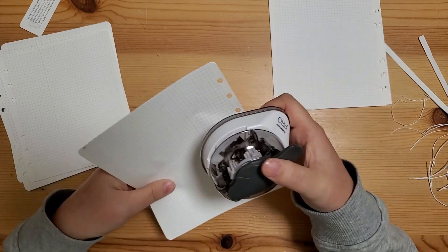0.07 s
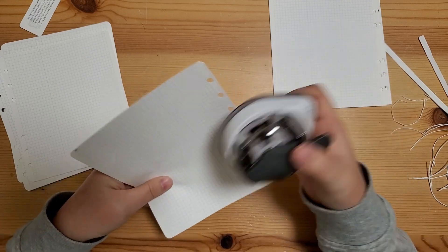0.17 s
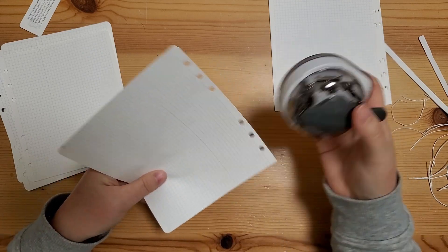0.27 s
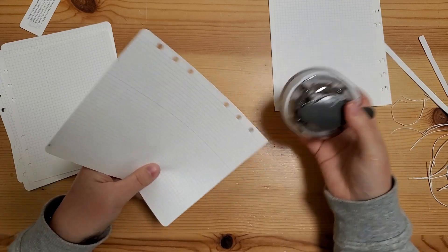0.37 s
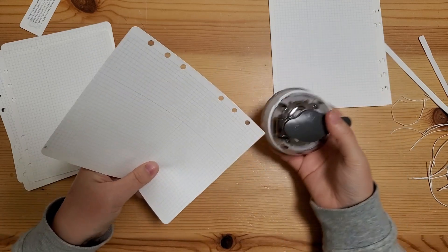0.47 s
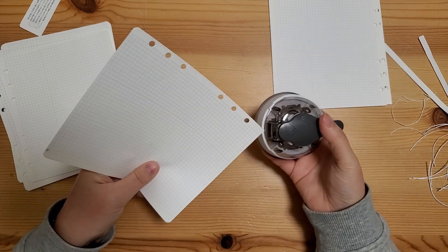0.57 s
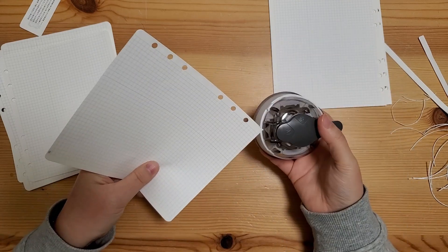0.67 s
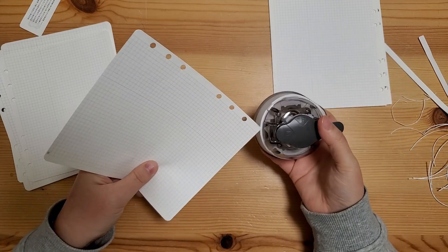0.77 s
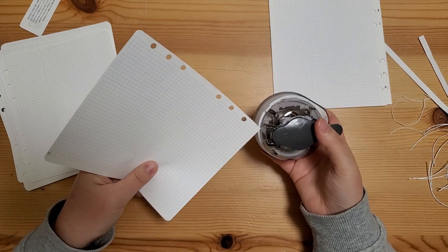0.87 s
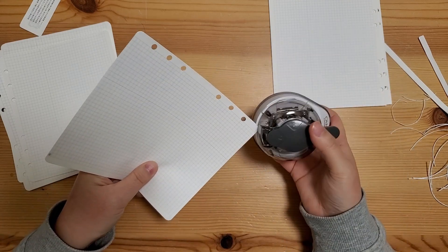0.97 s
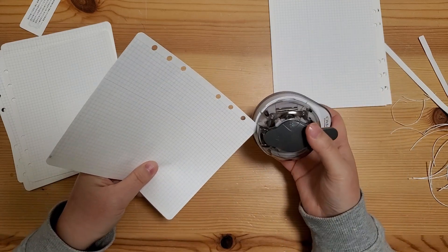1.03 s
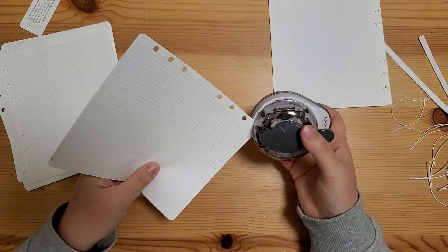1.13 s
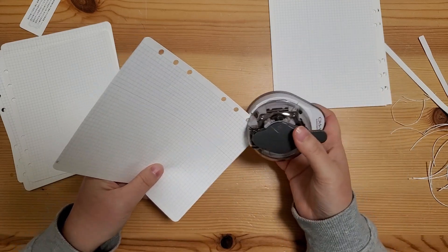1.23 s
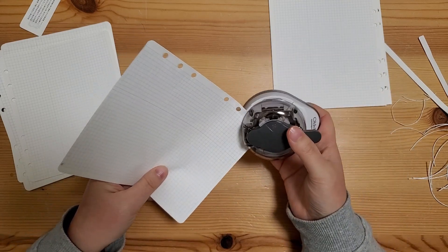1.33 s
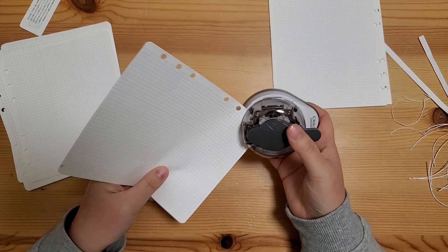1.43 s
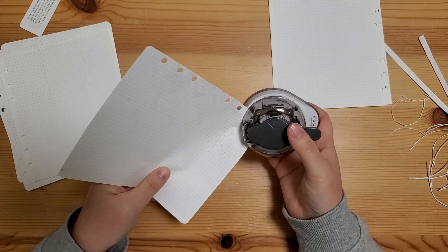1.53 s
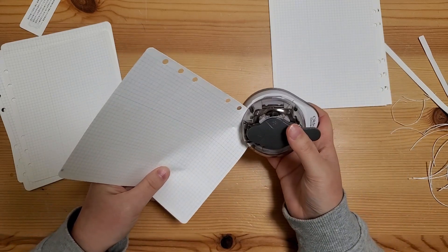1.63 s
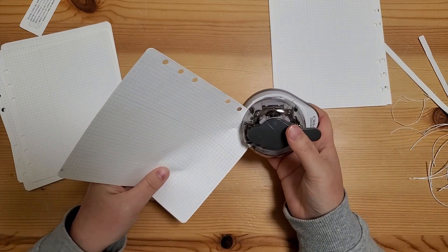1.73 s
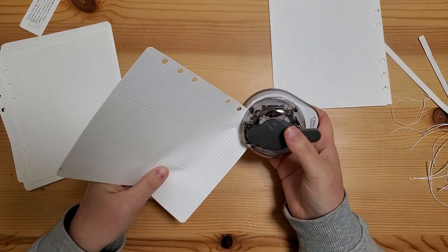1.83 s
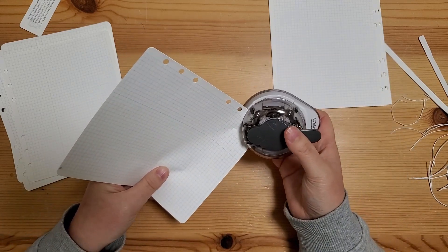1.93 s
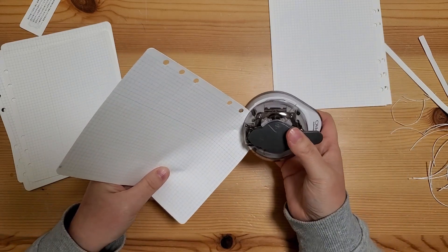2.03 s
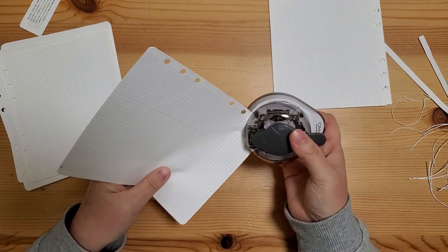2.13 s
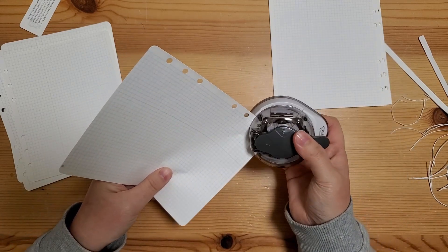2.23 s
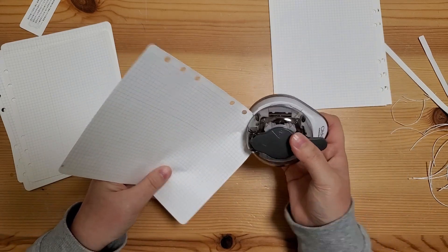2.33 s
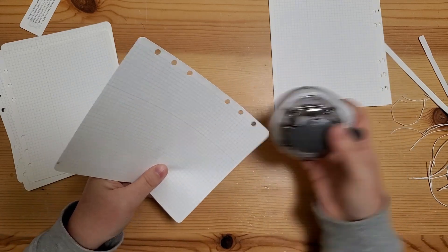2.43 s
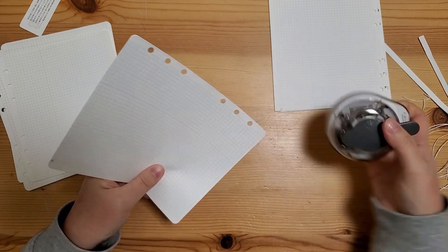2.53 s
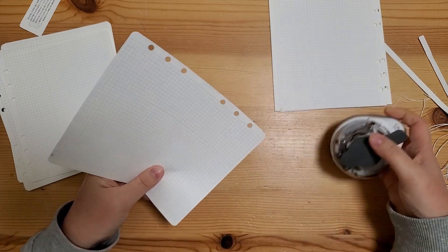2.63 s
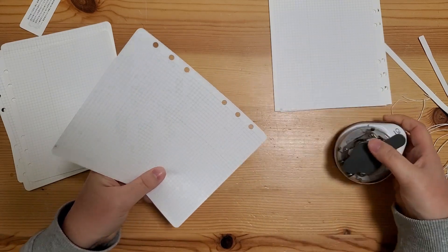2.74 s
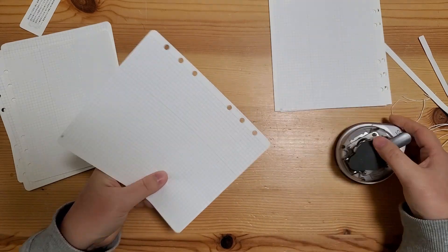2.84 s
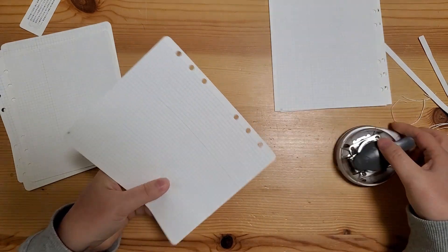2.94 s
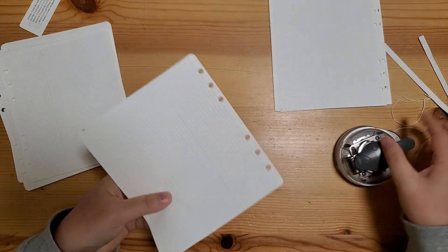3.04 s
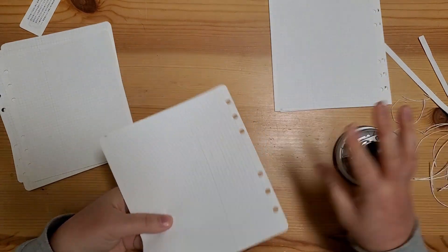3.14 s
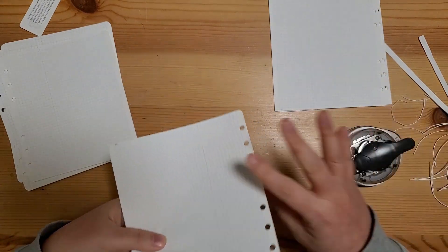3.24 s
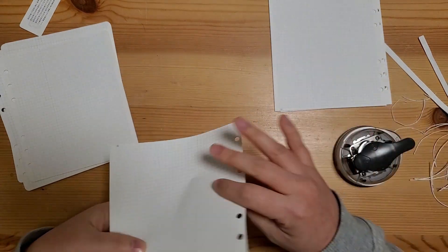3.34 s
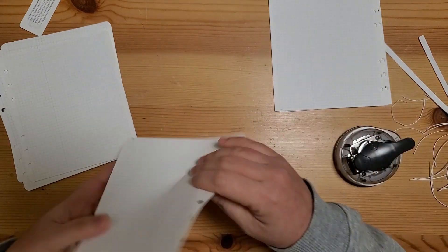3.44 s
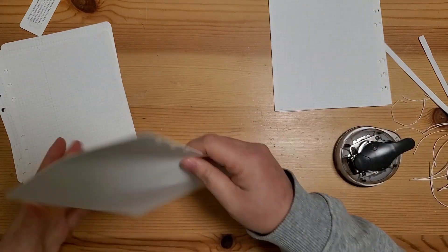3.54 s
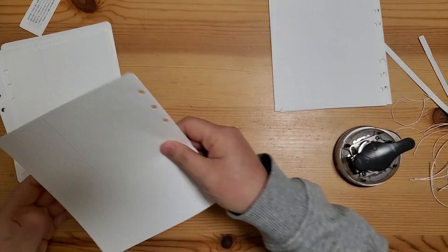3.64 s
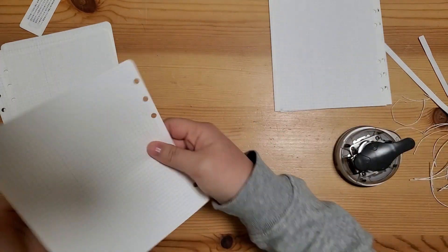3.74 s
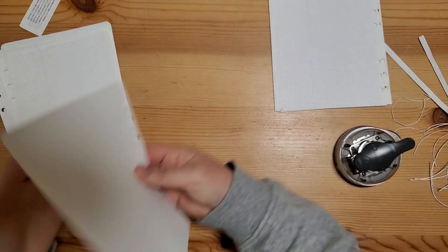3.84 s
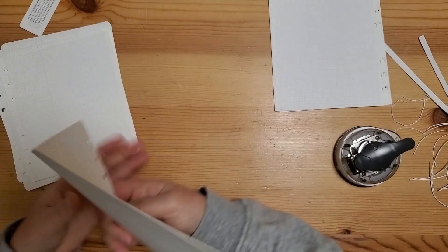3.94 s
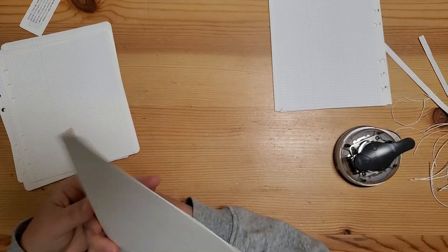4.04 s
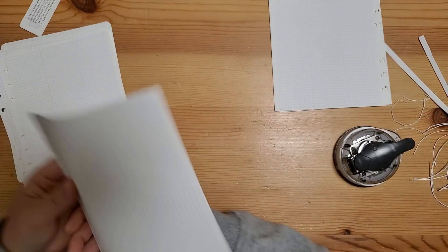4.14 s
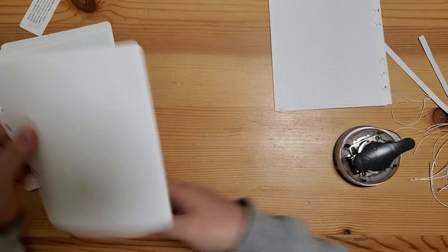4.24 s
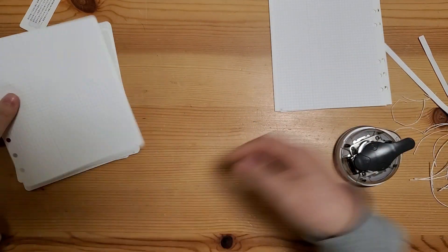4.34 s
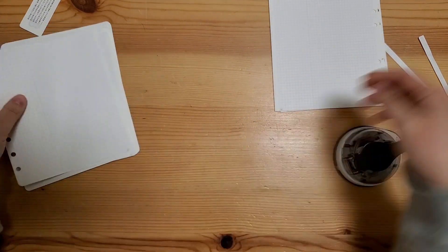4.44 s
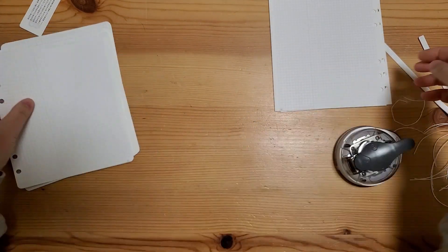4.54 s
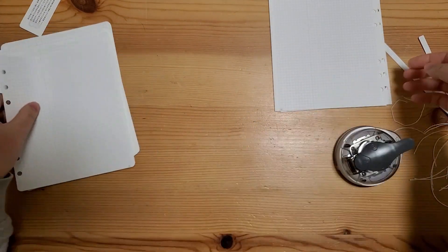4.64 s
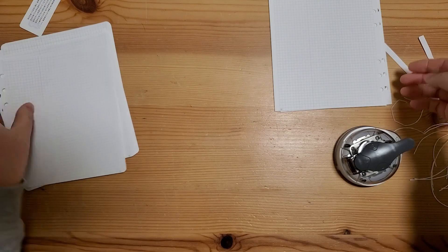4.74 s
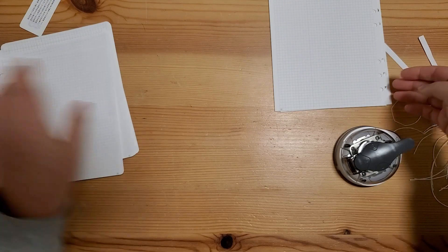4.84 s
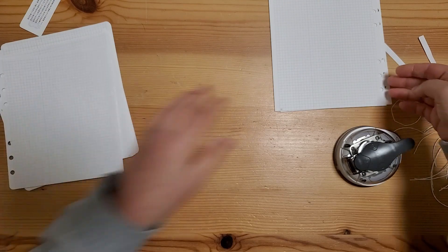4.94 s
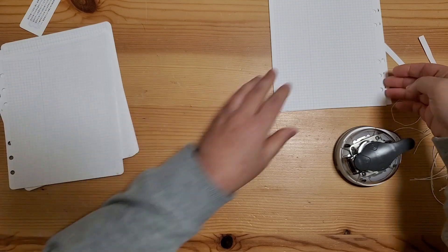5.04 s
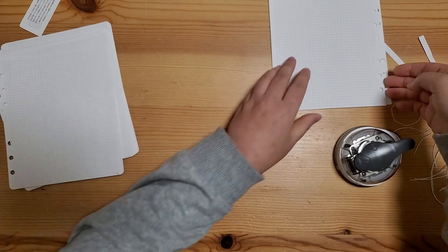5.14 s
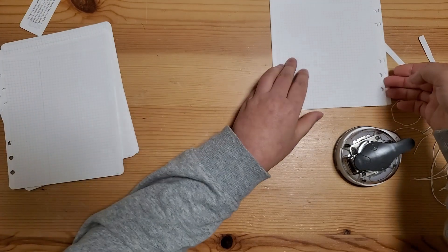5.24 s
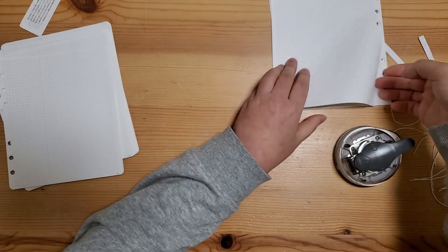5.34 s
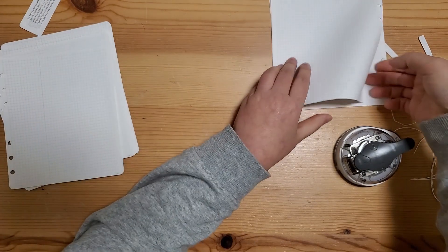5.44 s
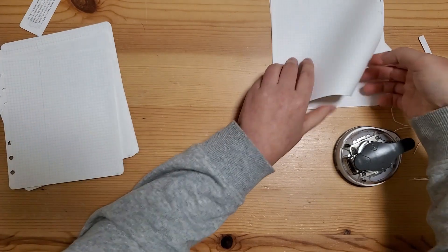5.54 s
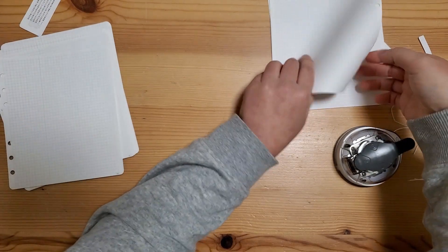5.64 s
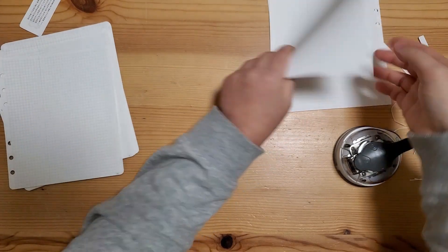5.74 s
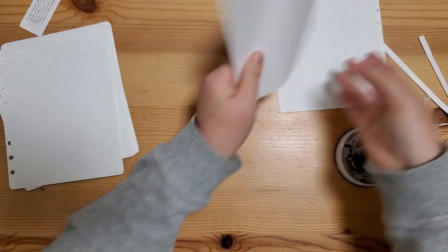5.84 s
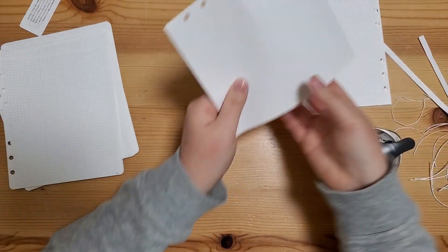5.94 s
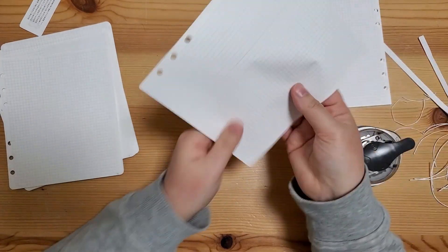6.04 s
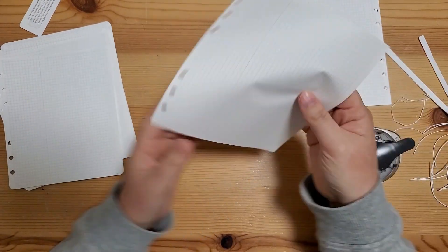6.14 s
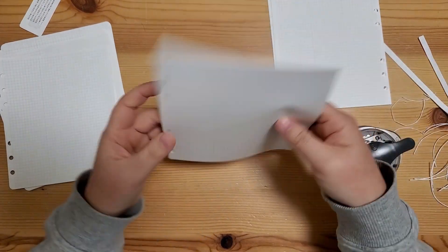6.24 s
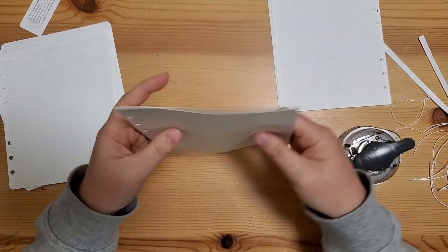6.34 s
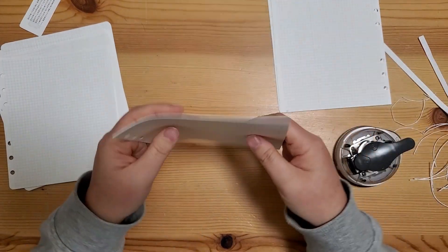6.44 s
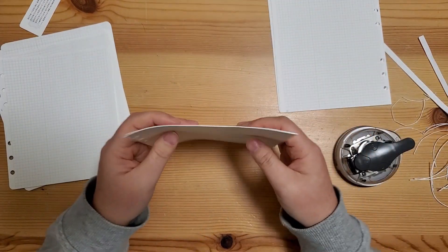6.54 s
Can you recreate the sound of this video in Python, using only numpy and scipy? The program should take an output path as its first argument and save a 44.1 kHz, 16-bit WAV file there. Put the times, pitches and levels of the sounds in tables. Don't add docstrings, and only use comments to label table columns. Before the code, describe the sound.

Quiet indoor desk work, heard close from above. Light sheet slides and a dull tick come before a single explosive punch crack with a short room tail. A bright spring click follows, then a knock and a fuller wooden thump as the punch is put down. Sheets rustle, crinkle and tick as they are turned over; after a lull, a fresh sheet is picked up with swishes, a sharp snap and low air puffs over faint room hum.

```python
import sys
import numpy as np
from scipy import signal
from scipy.fft import rfft, irfft
from scipy.io import wavfile
from scipy.ndimage import uniform_filter1d

SR = 44100
rng = np.random.default_rng(int(sys.argv[2]) if len(sys.argv) > 2 else 0)


def unload_wav(signal):
    wavfile.write(
        sys.argv[1],
        SR,
        np.round(np.clip(np.atleast_2d(signal).T, -1, 1) * 32767).astype(np.int16),
    )


def volts(x):
    e = np.asarray(x, float) / 20
    return 10 ** e


N = 291060

# hz, density_db_per_hz
FINE_FIBRES = [(7500, -6.5), (10000, 3), (13000, 2), (16000, 6.5)]
# hz, density_db_per_hz
BRIGHT_EDGE = [(2500, -38), (4000, 9.5), (7000, -4.5), (11000, -7.5), (16000, -13.5)]
PORTS = np.array([[.5], [-.5]])


def evened(x):
    return x / np.sqrt(np.mean(x ** 2) + 1e-20)


def read(points, hz):
    f, value = np.transpose(points)
    return np.interp(np.log(hz + 1), np.log(f + 1), value)


def add(mix, s, sound):
    part = mix[..., round(s * SR):][..., :sound.shape[-1]]
    part += sound[..., :part.shape[-1]]


def coloured(x, points, turn=1):
    size = x.shape[-1]
    gain = volts(read(points, np.fft.rfftfreq(size, 1 / SR)))
    return irfft(rfft(x) * turn * gain, size)


def pair(mid, side):
    # hz, side_re_mid_db
    port_width = [(60, -14.5), (110, -16), (200, -13), (380, -1), (700, 1), (1290, 3), (2380, 0),
                  (4400, 0.5), (8120, -0.5), (15000, 0)]
    side = coloured(side, port_width, 1j)
    return np.array([mid + side, mid - side])


def ring(modes, seconds=.4, rise_s=0.00069):
    t = np.arange(round(seconds * SR)) / SR
    sines = np.zeros(len(t))
    for k, (hz, db, t60_s) in enumerate(modes):
        decay = volts(db - 60 * t / max(t60_s, .004))
        sines += (-1) ** k * decay * np.sin(2 * np.pi * hz * t)
    return sines * (1 - np.exp(-(t / rise_s) ** 2))


def click(colour):
    hz = abs(np.fft.fftfreq(4096, 1 / SR))
    log_gain = np.log(volts(np.maximum(read(colour, hz), -90)))
    pulse = np.fft.ifft(np.exp(log_gain - 1j * signal.hilbert(log_gain).imag)).real[:2048]
    return pulse / np.linalg.norm(pulse)


def burst(t60_s, pulse):
    flurry = rng.standard_normal(2049) * volts(-60 * np.arange(2049) / SR / t60_s)
    return signal.fftconvolve(pulse, flurry / np.linalg.norm(flurry))


def hum():
    # hz, density_db_per_hz
    hum_colour = [(15, -47), (25, -12.5), (102, -14), (175, -6.5), (293, -7), (326, -6), (451, -12.5),
                  (516, -7), (575, -12.5), (936, -13), (1070, -15.5), (1330, -21), (3160, -34), (8830, -65),
                  (16000, -51)]
    # hz, width_hz, gain_db
    duct_bumps = [(76.6, 27, 13), (132.3, 14, 11), (217, 15, 8), (334.9, 15, 8.5), (24, 21, -9),
                  (12400, 4000, 7.5)]
    level_db = -46.5
    a, b, c, d, patches_db = rng.standard_normal((N // 256 + 5, 513, 5)).T
    patches_db = evened(uniform_filter1d(uniform_filter1d(patches_db, 8, 0), 14, 1))
    grains = np.array([a + 1j * b, c + 1j * d]) * volts(patches_db)
    noise = signal.istft(grains, nperseg=1024, noverlap=768)[1][:, :N]
    hz = np.fft.rfftfreq(N, 1 / SR)
    bumps_db = sum(db / (1 + (2 * (hz - f) / w) ** 2) for f, w, db in duct_bumps)
    mid, side = irfft(rfft(noise) * volts(read(hum_colour, hz) + bumps_db), N)
    return volts(level_db) * pair(mid, side) / np.std(mid)


def fibres(colour, per_s, spread_db, patchy_db):
    slips = (rng.random((2, N)) < per_s / SR) * rng.standard_normal((2, N))
    clumps = volts(spread_db * evened(uniform_filter1d(rng.standard_normal(N), 300)))
    z = signal.stft(slips * clumps, nperseg=256)[2]
    patches = rng.standard_normal(z.shape[:0:-1])
    patches = evened(uniform_filter1d(uniform_filter1d(patches, 10, 0), 3, 1)).T
    rubbed = signal.istft(z * volts(patchy_db * patches), nperseg=256)[1][:, :N]
    return evened(coloured(rubbed, colour))


def slides():
    # full_speed_s, swell_s, hold_s, hiss_db, bend_0_to_1
    feeding = [(0.0, .01, 0.048, -56, 0), (0.15, .05, 0.11, -72, 0.26), (0.32, 0.027, 0.019, -71, 0.5),
               (1.359, 0.033, .003, -67.5, 0.5), (1.38, .02, 0.013, -68, 0.62),
               (1.52, .04, 0.027, -79, 0.7), (1.677, 0.0082, 0.0091, -57, 0.4),
               (2.025, 0.017, 0.014, -70, 0.76), (2.066, 0.014, .003, -66, .3),
               (2.128, 0.0084, .003, -63, 0.2), (2.819, 0.12, 0.068, -61, 0),
               (3.031, 0.044, .003, -45.5, 0.4)]
    turning = [(3.37, .006, 0.0028, -67, .1), (3.41, 0.051, 0.025, -64, 0.32),
               (3.475, .05, 0.025, -58.5, 0.34), (3.549, 0.025, 0.036, -55.5, 0.63),
               (3.65, 0.022, 0.014, -70.5, 0.98), (3.785, 0.021, .003, -64, .2),
               (3.803, .01, 0.0027, -69, .1), (3.86, 0.027, 0.023, -71.5, 0.39),
               (4.10, .01, .02, -64.5, 0.53), (4.155, 0.032, 0.032, -50, 0.49),
               (4.28, .03, 0.033, -78, 0.67), (4.335, .02, 0.022, -81, 1), (4.445, 0.011, .01, -60, 0.76),
               (4.469, 0.021, 0.037, -55.5, 1), (4.56, 0.087, 0.013, -58.5, 0.62),
               (4.66, 0.083, 0.019, -67, 0.25), (4.77, 0.13, 0.035, -60, 0.3)]
    lifting = [(5.26, 0.036, 0.018, -78, .3), (5.40, 0.024, 0.053, -59.5, 0.38),
               (5.525, 0.12, 0.044, -57.5, 0.17), (5.59, 0.033, 0.04, -63.5, 0.22),
               (5.715, 0.014, 0.04, -62, 0.45), (5.79, 0.021, 0.009, -57, 0.16),
               (5.87, 0.084, 0.025, -53.5, 0.088), (6.056, 0.016, 0.0069, -52, 0.59),
               (6.129, 0.055, 0.0083, -51.5, 0.24), (6.169, 0.017, 0.0088, -55.5, 0.58),
               (6.21, 0.045, 0.046, -41.5, 0.16), (6.27, 0.022, 0.035, -52.5, 0.66),
               (6.44, 0.035, 0.013, -70.5, 0.68), (6.58, 0.18, 0.055, -69.5, 0.61)]
    # hz, density_db_per_hz
    hiss_colour = [(2500, 3), (4000, 5.5), (6000, 6), (8500, 2.5), (11500, -2)]
    # hz, density_db_per_hz
    crinkle_colour = [(350, -5), (600, -4), (1110, -3), (1330, -1), (2940, -2), (3600, -8.5), (4810, -17),
                      (6000, -50.5), (7800, -83), (13200, -120)]
    swell_db, fade_db_per_s = 18, 292.5
    crinkle_flat_db, crinkle_bent_db = -9, 19.5
    fizz_flat_db, fizz_bent_db = 0.5, -28
    t, power = np.arange(N) / SR, np.zeros((3, 2, N))
    for strokes, pan_db in (feeding, -1.5), (turning, 0.5), (lifting, -2.5):
        for s, swell_s, hold_s, db, bend in strokes:
            on = slice(max(round((s - .15) * SR), 0), round((s + .4) * SR))
            rise_db = swell_db * np.maximum(s - t[on], 0) / max(swell_s, .004)
            fade_db = fade_db_per_s * np.maximum(t[on] - s - hold_s, 0)
            crinkle_db = crinkle_flat_db + (crinkle_bent_db - crinkle_flat_db) * bend
            fizz_db = fizz_flat_db + (fizz_bent_db - fizz_flat_db) * bend
            shares_db = np.array([0, crinkle_db, fizz_db])[:, None, None]
            power[..., on] += volts(db - rise_db - fade_db + shares_db + PORTS * pan_db) ** 2
    hiss, crinkle, fizz = uniform_filter1d(np.sqrt(power), size=200, axis=2)
    sheet = hiss * pair(*fibres(hiss_colour, per_s=11000, spread_db=1.0, patchy_db=4.0))
    sheet += fizz * pair(*fibres(FINE_FIBRES, per_s=27000, spread_db=2.0, patchy_db=1.5))
    return sheet + crinkle * pair(*fibres(crinkle_colour, per_s=10000, spread_db=0.9, patchy_db=4.0))


def ticks():
    # start_s, peak_db, ring_hz, left_right_db
    corner_pips = [(0.1768, -34, 1700, -2), (0.2834, -45, 1500, -3), (0.754, -45, 1000, 0),
                   (1.3622, -22, 1100, -2), (3.3715, -30, 2300, 0), (3.5477, -34, 2200, -2),
                   (3.6478, -30, 1900, -1), (3.6567, -32, 1150, -3), (4.1995, -21.5, 2300, 2),
                   (4.258, -28, 2000, 2), (4.3425, -32, 1800, 2), (5.997, -33, 1050, -4),
                   (6.2525, -11, 1400, -5)]
    dull_ticks = [(0.319, -38, 980, -12), (0.333, -41, 1200, -3), (1.365, -30.5, 880, -2),
                  (1.677, -43, 1140, -8), (3.365, -38, 1310, -6), (3.37, -22, 930, -2),
                  (3.374, -26.5, 1223, -4), (3.69, -33, 1080, -.5), (3.776, -33.5, 794, .5),
                  (4.211, -23.5, 1940, 1), (4.344, -30, 536, -14), (4.351, -35, 1540, 5),
                  (4.3995, -28, 885, 12), (4.41, -33, 1200, 4), (4.414, -24, 1130, 13.5),
                  (4.607, -34.5, 1330, 9), (5.40, -42, 2000, -8), (6.134, -32, 835, -5),
                  (6.1611, -32.5, 1640, -16), (6.215, -32.5, 406, -1), (6.55, -42, 1410, -5)]
    lever_release = [
        (2.4778, -24, 2300, -8),
        (2.4832, -14.5, 2110, -8),
        (2.505, -27, 1040, -2),
        (2.5105, -28, 2300, -8),
        (2.5215, -28, 1150, -10),
    ]
    edge_ticks = [
        (3.546, -36.5, 1217, -3),
        (3.802, -56, 1290, -2),
        (4.098, -50, 1310, 3),
        (4.484, -27.5, 1200, 16),
        (4.504, -34, 1400, 4),
        (5.787, -45, 1190, 2),
        (6.048, -39, 2360, -1),
        (6.218, -40, 1560, -6),
    ]
    sheet_flicks = [
        (4.4675, -19, 2500, 2),
    ]
    # multiple_of_ring_pitch, density_db_per_hz
    struck_patch = [(.2, -58.5), (.45, 0.5), (.9, 2), (1.1, 7), (2.2, -10.5), (3.2, -23), (6, -51)]
    kinds = ((0.33, -0.36, 0.029, lever_release), (1, 3.6, 0.0077, sheet_flicks),
             (0.39, 2.3, 0.079, edge_ticks), (0.27, -39, 0.037, dull_ticks), (.35, -16, .009, corner_pips))
    out, bright = np.zeros((2, N)), click(BRIGHT_EDGE)
    for ringing, edge_db, t60_s, events in kinds:
        for s, db, hz, pan_db in events:
            body = ring([(hz, 0, t60_s)], 4096 / SR, 1.5 / hz)
            patch = [(hz * ratio, patch_db) for ratio, patch_db in struck_patch]
            flurry = burst(t60_s, click(patch))
            sound = ringing * body / abs(body).max() + (1 - ringing) * flurry / abs(flurry).max()
            sound += volts(edge_db) * burst(0.05, bright)
            add(out, s, volts(db + PORTS * pan_db) * sound)
    return out


def singing():
    # start_s, length_s, level_db, from_hz, to_hz
    sung_notes = [(0.255, 0.012, -57, 2230, 2220), (2.487, 0.014, -32, 2120, 2080),
                  (2.509, 0.0048, -23.5, 1140, 1130), (3.123, 0.029, -45.5, 1080, 1150),
                  (3.144, .015, -60, 2310, 2300), (3.55, 0.025, -53.5, 5470, 5500),
                  (3.567, .014, -62, 7100, 6940), (3.574, 0.04, -51.5, 3800, 3660),
                  (3.616, 0.022, -59, 3670, 3690), (3.587, 0.036, -60, 4770, 4630),
                  (4.329, 0.011, -44.5, 1600, 1610), (4.352, 0.048, -56, 2650, 2560),
                  (4.399, .018, -40.5, 2650, 2580), (4.402, 0.014, -33.5, 1080, 1170),
                  (4.47, 0.036, -38, 993, 1317), (4.504, 0.043, -44, 1295, 1090),
                  (6.043, 0.021, -51, 2680, 2700), (6.108, .014, -50, 1680, 1690),
                  (6.15, 0.039, -58, 1780, 3600), (6.173, .024, -52, 2920, 2940),
                  (6.193, 0.037, -49, 4800, 4620), (6.215, 0.041, -45.5, 2820, 2940),
                  (6.251, 0.0123, -36.5, 3430, 3320), (6.2522, 0.0025, -34, 6900, 6400),
                  (6.253, 0.0059, -31, 1376, 1510), (6.27, .035, -45.5, 2900, 3240)]
    width_re_pitch, fuzz_re_tone = .1, .9
    out = np.zeros((2, N))
    for s, length_s, db, from_hz, to_hz in sung_notes:
        u = np.arange(round(length_s * SR)) / (length_s * SR)
        turn = np.exp(2j * np.pi * np.cumsum(from_hz + (to_hz - from_hz) * u) / SR)
        r = np.exp(-np.pi * width_re_pitch * from_hz / SR)
        noise = rng.standard_normal((4096, 4)).T
        slow = signal.lfilter([1], [1, -2 * r, r * r], noise[:2] + 1j * noise[2:])[:, -len(u):]
        tone = evened(((1 + fuzz_re_tone * slow / np.std(slow)) * turn).imag)
        add(out, s, volts(db) * tone * np.sin(np.pi * u) ** .5)
    return pair(*out)


def punch():
    # hz, density_db_per_hz
    cut_colour = [(300, -17.5), (1000, -13), (2000, -3), (3700, 0), (4600, -11.5), (16000, -16.5)]
    # hz, density_db_per_hz
    crack_colour = [(150, -46.5), (250, -25.5), (308, -14.5), (460, -7), (1060, -8), (1310, -5),
                    (1670, -9.5), (1980, -1), (2710, -7), (2960, -0.5), (3910, -16.5), (12100, -15.5),
                    (16000, -19.5)]
    # hz, level_db, t60_s
    shell_modes = [(1400, -5, .006), (2400, 0, .007), (3000, -2, .008), (3700, -6, .005)]
    # delay_s, strength
    rattle_hits = [
        (.0105, .3),
        (0.0275, .22),
        (0.027, -.22),
        (.033, .2),
        (.0515, .22),
        (0.06, -.15),
        (.0715, .16),
        (.092, .12),
        (.11, .06),
    ]
    snap_s, snap_db, shear_db, bang_db = 2.2727, 4.5, -15, 20.5
    jolt_db, jolt_s = -25, 0.0021
    near, bang, t = np.zeros(N), np.zeros(N), np.arange(-.03, 0, 1 / SR)
    shear = evened(np.convolve(rng.standard_normal(len(t)), click(cut_colour))[:len(t)])
    add(near, snap_s + t[0], shear * volts(shear_db + 1400 * t))
    blows = np.zeros(6000)
    blows[[0, 52, 117, 330]] = 1, -.7, .5, .3
    for delay_s, strength in rattle_hits:
        blows[round(delay_s * SR)] = strength
    crack = click(crack_colour)
    strike = .8 * ring(shell_modes, 2048 / SR, .0003) + crack
    strike += burst(.008, click(BRIGHT_EDGE))[:2048] + burst(.012, click(FINE_FIBRES))[:2048]
    add(near, snap_s, volts(snap_db) * signal.fftconvolve(strike, blows))
    u = np.arange(2000) / SR / jolt_s
    add(near, snap_s, volts(jolt_db) * u * np.exp(1 - u))
    add(bang, snap_s, volts(bang_db) * crack)
    return near, bang


def knocks():
    # start_s, peak_db, bounce_delay_s, bounce_share, room_energy_db
    desk_hits = [
        (2.7758, -10.5, .025, 0.23, 8.5),
        (3.0169, -4.5, 0.00817, 0.57, 11.5),
    ]
    # hz, level_db, t60_s
    rim_modes = [(59, -19.5, 0.4), (261.6, -1, 0.057), (302, -3.5, 0.055), (378.5, -2, 0.04),
                 (480, -6.5, 0.024), (620, -14, 0.0316)]
    # hz, level_db, t60_s
    base_modes = [(64.5, -17.5, 0.53), (124, -13, 0.074), (224.2, -7.5, 0.17), (297, -6, 0.21),
                  (387.7, -4.5, 0.058), (440, -1.5, 0.16), (602, -3.5, 0.05), (730, -10.5, 0.077),
                  (794, -12.5, .08), (920, -14, 0.09)]
    # hz, density_db_per_hz
    thud_colours = [
        [(59, -33), (100, -3.5), (163, -14.5), (247, -4), (495, -8.5), (793, -30), (1130, -31), (1450, -38), (2910, -35), (4160, -45), (9000, -61), (11700, -72), (19800, -120)],
        [(59, -48), (100, -7.5), (158, -12), (194, 5.5), (339, -7.5), (425, 2), (580, -3.5), (630, -4.5), (993, -7), (1270, -15.5), (2180, -20.5), (14000, -59)],
    ]
    # hz, density_db_per_hz
    plastic_colour = [(500, -13.5), (1100, -0.5), (1600, -6.5), (2400, 2), (3500, -3.5), (6000, -12.5),
                      (11000, -24), (16000, -25)]
    tap_db, clack_db = 1.5, -11.5
    near, thud, plastic = np.zeros(N), np.zeros(N), click(plastic_colour)
    for hit, modes, colour in zip(desk_hits, (rim_modes, base_modes), thud_colours):
        s, db, delay_s, share, room_db = hit
        boom = ring(modes, 0.44, 0.00068)
        blow = volts(db) * boom / abs(boom).max()
        add(near, s, blow)
        add(near, s + delay_s, share * blow)
        add(near, s, volts(db + tap_db) * burst(0.035, plastic))
        add(near, s, volts(db + clack_db) * plastic)
        add(thud, s, volts(room_db) * click(colour))
    return near, thud


def squeak():
    start_s, end_s, pitch_hz, level_db, ramp_s = 5.21, 5.33, 5550, -86, 0.017
    t = np.arange(N) / SR
    envelope = np.clip(np.minimum(t - start_s, end_s - t) / ramp_s, 0, 1)
    return volts(level_db) * np.sin(2 * np.pi * pitch_hz * t) * envelope


def air():
    # centre_s, level_db, half_length_s
    sheet_puffs = [
        (5.239, -59, 0.066),
        (5.804, -46, 0.055),
        (6.025, -55, .04),
        (6.13, -49, 0.032),
        (6.314, -41, 0.034),
        (6.448, -41, 0.035),
    ]
    t = np.arange(N) / SR
    lump_colour = [(12, -25.0), (25, -23.0), (45, -3), (80, -44.0), (200, -92)]  # hz, density_db_per_hz
    a, b = coloured(rng.standard_normal((2, N)), lump_colour)
    level = sum(volts(db) * np.exp(-((t - s) / half_s) ** 2) for s, db, half_s in sheet_puffs) / np.std(a)
    return level * np.array([a + 0.9 * b, a - 1.34 * b])


def room(x):
    # hz, t60_s
    room_decay = [(250, 0.22), (660, 0.39), (1740, 0.33), (4590, 0.37), (12100, 0.25)]
    clusters = volts(.6 * evened(uniform_filter1d(rng.standard_normal(SR), 90)))
    build_up = 1 - np.exp(-np.arange(SR) / SR / .007)
    taps = rng.standard_normal((2, SR)) * clusters * build_up
    hz, t, z = signal.stft(taps, SR, nperseg=128)
    tail = signal.istft(z * volts(-60 * t / read(room_decay, hz)[:, None]), SR, nperseg=128)[1]
    tail = tail / np.linalg.norm(tail[0])
    return pair(*signal.fftconvolve(x[None], tail, axes=1)[:, :N])


def scene():
    small, (snap, bang), (boom, thud) = ticks(), punch(), knocks()
    small_mid = small.mean(0)
    centre = small_mid + boom
    direct = pair(centre + .5 * snap, .9 * centre + snap) + (small - small_mid)
    wet = volts(-1) * room(volts(-8.0) * small_mid + bang + thud)
    return direct + wet + slides() + air() + hum() + squeak() + singing()


def low_pass(x):
    return signal.sosfilt(signal.butter(12, 16240, fs=SR, output="sos"), x)


def record(dry):
    recovery_db_per_s, threshold_db, edge_hz = 97.0, -6.5, 15950
    power = signal.lfilter([1 / 130], [1, 1 / 130 - 1], (dry ** 2).max(0))
    power_db = 10 * np.log10(abs(power) + 1e-12)
    fall_db = np.arange(N) * recovery_db_per_s / SR
    held_db = np.maximum.accumulate(power_db + fall_db) - fall_db
    over_db = np.maximum(held_db - threshold_db, 0)
    ducked = np.clip(dry / volts(.85 * over_db), -1, 1)
    lowpass = signal.firwin(511, edge_hz, window=("kaiser", 9), fs=SR)
    return low_pass(signal.oaconvolve(ducked, lowpass[None], "same"))


dry = scene()
out = record(dry)
unload_wav(out)
```